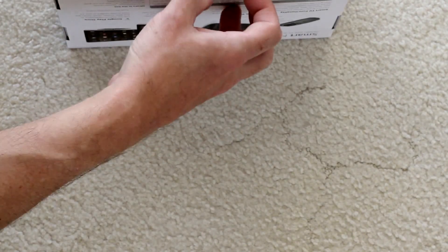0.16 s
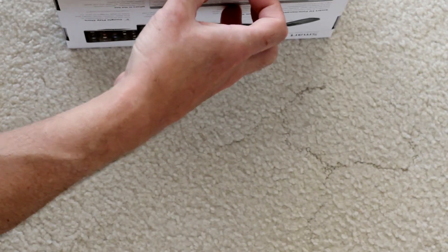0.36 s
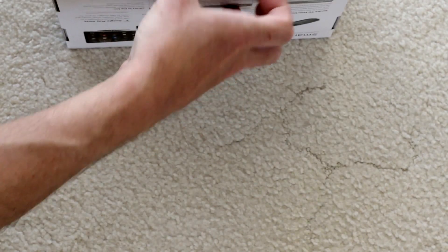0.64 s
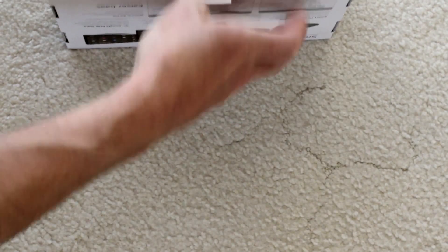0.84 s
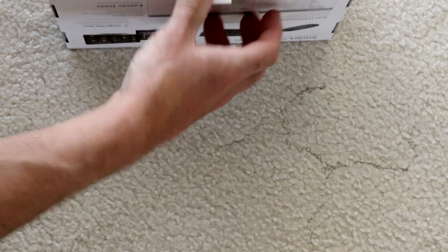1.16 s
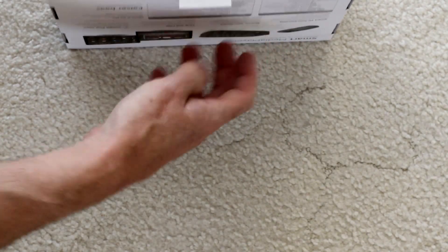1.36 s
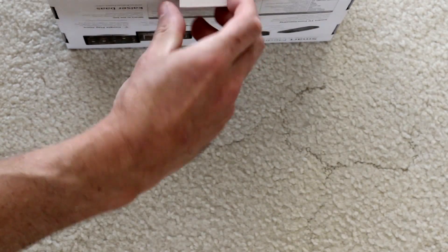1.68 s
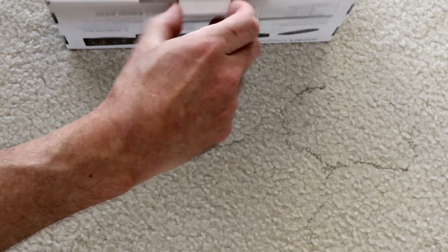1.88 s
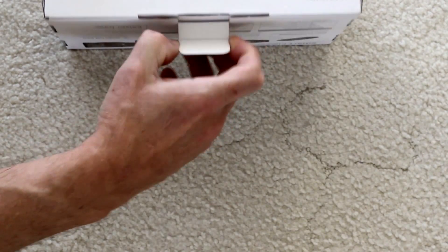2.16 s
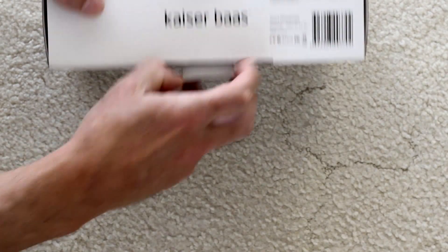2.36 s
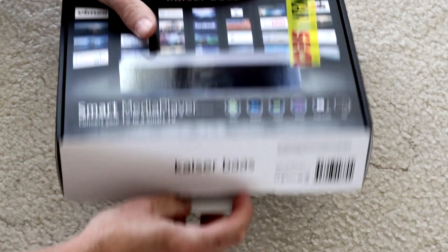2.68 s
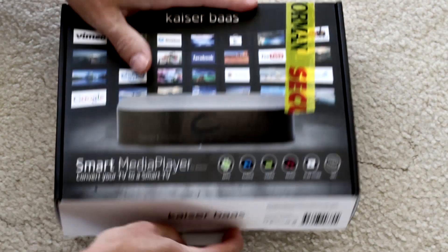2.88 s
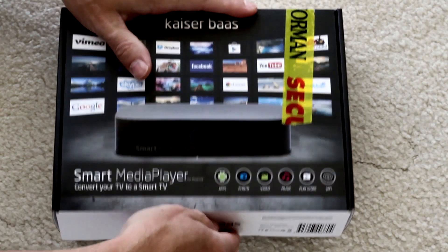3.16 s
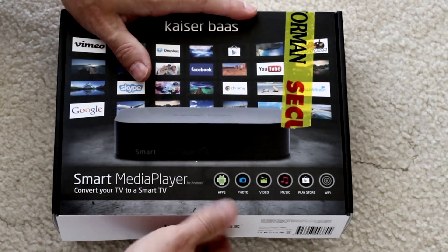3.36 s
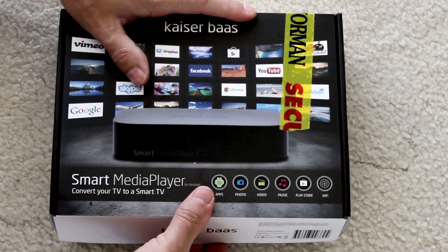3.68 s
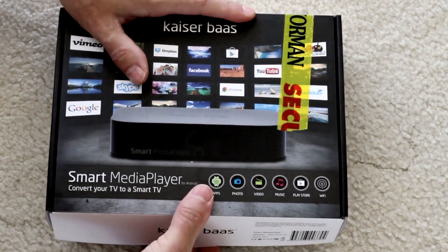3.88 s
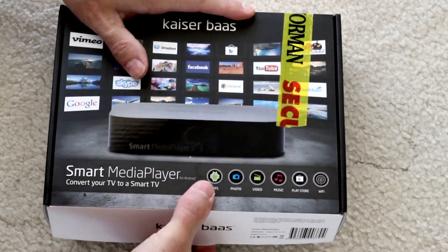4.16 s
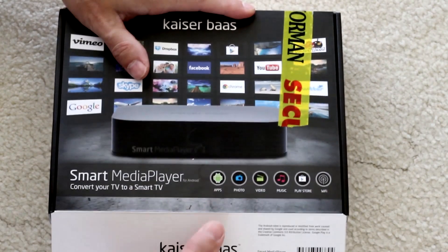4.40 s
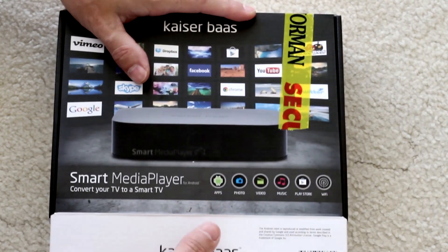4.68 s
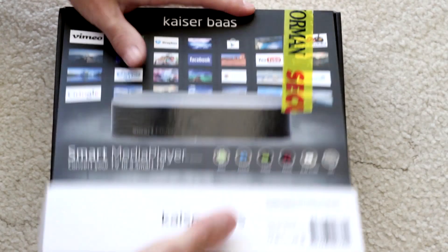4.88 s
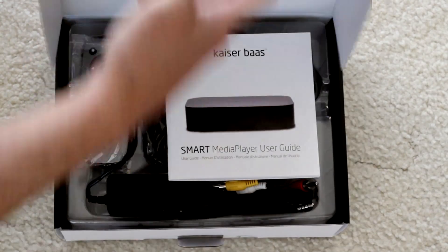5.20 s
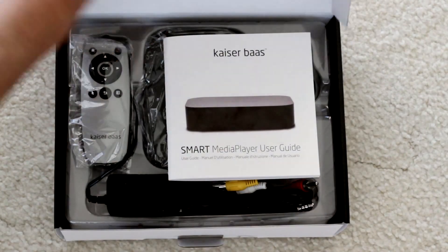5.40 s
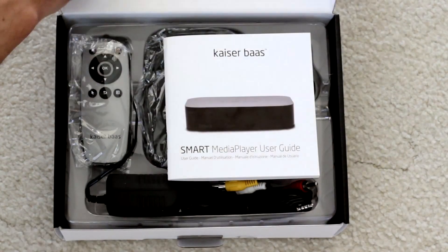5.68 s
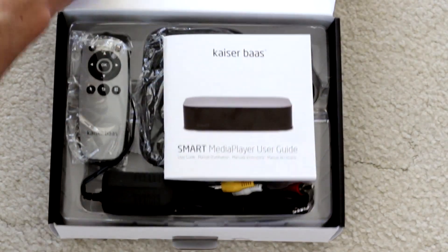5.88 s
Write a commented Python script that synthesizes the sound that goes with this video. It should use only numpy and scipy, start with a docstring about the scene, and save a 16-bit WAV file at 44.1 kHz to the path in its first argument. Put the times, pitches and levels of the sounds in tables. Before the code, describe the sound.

A cardboard box is opened by hand, close to a camera microphone in a small furnished room with a short, soft echo. Steady low hiss runs throughout. From 0 to 0.8 s fingers pick at the tab with faint ticks and light taps, a thin hoarse whistle far off at 0.3. At 0.9 a loud double snap with a gritty scrape frees the tab, which shivers briefly; a clear knock follows at 1.35. From 1.6 to 2.6 come uneven papery scrapes and hollow taps. Around 2.9 to 3.3 the box brushes across carpet with small bumps. Quiet fumbling and rubbing lead to a very sharp, dry double snap at 4.4. Softer rubs and taps follow, then a swish of card at 5.0 to 5.1 as the lid lifts. Sparse taps, the faint whistle again at 5.4, and a small stuttering fold creak at 5.7 to 5.9 end it, with low air puffs.

```python
"""A cardboard box: a hand works its tab loose, drags it over a carpet, pulls the flap out and lifts the lid.
Knocks, snaps and scrapes are noise bursts ringing the hollow, panels, edges and paper fibres; rubbing is grainy
noise in the same resonances. The freed tab, the carpet and the creaking fold are noise with their own colours.
A thin, jittery tone whistles far off and low noise puffs. A small furnished room answers the contacts, over
the steady hiss of a camera microphone."""
import sys
import numpy as np
from scipy import signal
from scipy.fft import rfft, irfft, next_fast_len
from scipy.io import wavfile
from scipy.ndimage import map_coordinates

SR = 44100
rng = np.random.default_rng(int(sys.argv[2]) if len(sys.argv) > 2 else 0)


def wrap_up_sound(samples):
    """Save the sound to the file named by the first command line argument, as 16-bit audio."""
    columns = np.atleast_2d(samples).T
    # keep every value between -1 and 1, then stretch to whole-number steps
    tamed = np.clip(columns, -1, 1)
    steps = np.round(tamed * 32767).astype(np.int16)
    wavfile.write(sys.argv[1], SR, steps)


N = 266452

# Knocks and snaps. Each row: start in seconds, panel level in dB, hollow, edges and fibres in dB over it,
# panel note in Hz, decay time (t60) in seconds before each part takes its share.
KNOCKS = [(.028, -39, -5, 0, -5.5, 940, 0.048), (.194, -52, -15, -3, -6, 1310, 0.049),
          (.302, -25, -4.5, -25, -29, 900, .062), (.471, -46, -15, -2, -18, 880, 0.053),
          (0.4973, -26, -3.5, 1.5, -4, 955, .04), (.573, -42.5, -4, 0, -20, 1350, 0.039),
          (.602, -45.5, -6, 1, -18, 1420, 0.03), (.693, -51, -3, 12, -22, 1280, 0.02),
          (0.757, -35, -3, -7, -18, 1670, .036), (.785, -36, -17, -5, -7, 1040, .03),
          (.877, -10.5, -16.5, -13, -18, 1200, 0.057), (.895, -4.5, -22, -13, -23, 1290, 0.066),
          (.951, -30.5, 10, -20, -20, 1220, .05), (1.256, -39.5, -13, -1.5, -22, 1990, .043),
          (1.31, -30, -19, -4, -9, 1680, .07), (1.352, -15, 0.5, -5.5, -30, 1280, 0.046),
          (1.58, -27.5, -8.5, -9, -26, 940, 0.044), (1.591, -26, -11, -9, -20, 1410, 0.039),
          (1.9, -28, -10.5, -23, -20, 1820, .051), (2.031, -39.5, -5, 1, -2, 960, 0.067),
          (2.121, -18, -8.5, -9, -8.5, 1010, 0.04), (2.196, -31.5, -8, -11, -31, 1340, 0.047),
          (2.442, -29.5, -12, -15, -31, 1310, .055), (2.559, -29, -15, -19, -30, 1430, 0.038),
          (2.745, -42.5, -7, -1, -13, 894, 0.037), (2.891, -31.5, -11.5, -17, -28, 1980, 0.022),
          (2.913, -38, -1, -7, -20, 740, 0.042), (2.962, -22.5, -11, -7, -14, 740, 0.019),
          (3.204, -26.5, 3, -9, -23, 700, 0.016), (3.239, -24, -13, -11, -14, 770, .035),
          (3.249, -22.5, -22, -15, -31, 700, 0.04), (3.548, -43.5, 1.5, -3, -3.5, 891, .035),
          (3.571, -40.5, -2, -5, -12, 730, .025), (3.597, -32, -8, -19, -24, 750, 0.024),
          (3.621, -30, -14, 1.5, 4, 736, .02), (4.093, -32.5, -14, -11, -21, 703, 0.04),
          (4.104, -22, -21, -15.5, -32, 1750, 0.051), (4.151, -24.5, -6, -18, -23, 1500, .035),
          (4.193, -32.5, -7, -18, -26, 1540, .032), (4.211, -28, -14, -9, -33, 960, .025),
          (4.388, -5.5, -11.5, -14, -25, 1520, .02), (4.397, -3.5, -15.5, -9.5, -18, 1630, 0.024),
          (4.402, -25.5, -5, -1, -16, 1570, 0.019), (4.747, -31, -8, -10, -28, 710, .03),
          (4.792, -24, -20, -11.5, -23, 820, .042), (4.876, -24.5, -18, -17.5, -38, 730, 0.057),
          (4.972, -30, -3.5, 5, 0, 2140, 0.029), (4.983, -28, -7, -2.5, -1, 740, 0.096),
          (5.124, -36.5, -16, 7, -10, 1420, .045), (5.148, -33, -14, -5, -4, 760, 0.037),
          (5.195, -37.5, -14, -3, -8, 880, .036), (5.299, -52.5, -4, 7, 14, 1490, 0.019),
          (5.323, -40, -23.5, -11, -0.5, 1170, 0.026), (5.423, -31, -6, -12, -35, 1410, 0.033),
          (5.473, -38, -8, -10, -24, 2140, .045), (5.698, -23, -22, -16.5, -38, 880, 0.044),
          (5.974, -29, -10.5, -28, -33, 738, 0.041)]
# Short scrapes of finger and flap. Each row: as for the knocks, but timed at the loudest moment.
SCRAPES = [(.168, -38.5, 0.5, -1, -11.5, 1370, .03), (0.208, -47.5, -15, 4, -14, 1390, 0.06),
           (0.295, -51, 1, 4, -2, 1420, .07), (.902, -9, -16, -5, -6.5, 1190, 0.051),
           (1.14, -48, -19, -17, -8, 1340, .07), (1.3, -35.5, -9, -7, -14, 1220, 0.18),
           (1.618, -27.5, -18, -22, -33, 680, .09), (1.717, -27, -18, -11, -21, 1940, .14),
           (1.973, -41, -23, -5.5, -20, 1310, .11), (2.063, -24, -9.5, -2, -12.5, 1410, .1),
           (2.088, -33, -14, 0, -9, 2050, 0.11), (2.224, -39, -6, -9, -31, 1380, .14),
           (2.361, -33, -10, -10, -19, 1290, .05), (2.464, -39.5, -13, -8, -30, 1450, 0.074),
           (2.538, -32, -15, -7, -38, 1420, 0.15), (2.936, -35.5, -2.5, -10, -26, 1160, 0.099),
           (3.262, -33, -9.5, -11, -23, 730, .09), (3.446, -42, -2.5, -19, -25, 820, 0.051),
           (3.664, -28, -6, -7.5, -17, 1610, 0.087), (4.006, -33.5, -10.5, -19, -30, 895, 0.054),
           (4.082, -35, -9.5, -21, -30, 1530, .05), (4.119, -29, -10, -18, -30, 780, 0.21),
           (4.31, -41.5, 2.5, -14, -27, 800, .09), (4.341, -27, -5.5, -14.5, -28, 1700, 0.13),
           (4.385, -13.5, -9, -13.5, -16, 1520, 0.067), (4.45, -40, -5, 2.5, -12, 1430, 0.067),
           (4.614, -38.5, -5, -5, -17, 1510, .11), (4.656, -42, 2.5, -21, -30, 760, .16),
           (4.714, -31.5, -6.5, -18, -30, 710, .1), (4.824, -44, -2, -5, -12, 760, 0.066),
           (5.014, -27.5, -10.5, -21, -15, 940, 0.099), (5.072, -32, -2, -15, -22, 905, .12),
           (5.094, -33.5, -4, -7, -22, 760, 0.11), (5.893, -30.5, -14, -11, -23.5, 920, 0.069)]
# Resonances of the air and big walls, of the flaps, and of the stiff tab and edges.
# Each row: frequency in Hz, width in Hz, relative level in dB.
HOLLOW = [(140, 35, -15), (211.7, 31, -0.5), (299.3, 33.3, 0.5), (362.4, 38, 1), (513, 30, 0),
          (656.5, 41, 1)]
PANELS = [(856, 108, -8), (1112, 128, -7.5), (1137, 59, -4.5), (1406, 62, -15.5), (1596, 116, -8),
          (1667, 455, -11), (2104, 700, -17.5)]
EDGES = [(2715, 1380, 6), (2487, 2340, -4), (3876, 82, 5), (3815, 1530, -2), (5350, 570, 2.5),
         (5400, 224, 2), (6110, 1050, -10)]


def amp(db):
    """Gain of a level in dB."""
    return 10 ** (np.asarray(db) / 20)


def unit(x):
    """x at rms 1."""
    return x / np.sqrt(np.mean(x ** 2) + 1e-20)


def along(points, hz):
    """Values at hz, read from (Hz, value) points on a log frequency axis."""
    point_hz, values = np.transpose(points)
    return np.interp(np.log(hz + 1), np.log(point_hz + 1), values)


def curves(rows):
    """One value per sample for each column after the time."""
    seconds, *columns = np.transpose(rows)
    t = np.arange(N) / SR
    return [np.interp(t, seconds, column) for column in columns]


def wobble(rate):
    """A smooth random curve, rate knots a second."""
    knots = rng.standard_normal(int(N * rate / SR) + 4)
    return map_coordinates(knots, [np.arange(N) * rate / SR])


def swell(start, end, rise_db, fall_db):
    """Gain 1 from start to end, rising before and falling after by so many dB a second."""
    t = np.arange(N) / SR
    return amp(-rise_db * np.maximum(start - t, 0) - fall_db * np.maximum(t - end, 0))


def filtered(x, response):
    """x shaped by a complex response of frequency."""
    size = next_fast_len(x.shape[-1] + 8192)  # spare room for ringing
    spectrum = rfft(x, size) * response(np.fft.rfftfreq(size, 1 / SR))
    return irfft(spectrum, size)[..., :x.shape[-1]]


def modes(table):
    """The causal response of a set of resonances, falling steeply outside their range."""
    lo_hz, hi_hz = .75 * min(table)[0], 1.4 * max(table)[0]

    def response(f):
        skirts = (1j * f / (lo_hz + 1j * f)) ** 2 * (hi_hz / (hi_hz + 1j * f)) ** 2
        total = 0
        for k, (hz, width, db) in enumerate(table):
            resonance = 1j * f * width / (hz * hz - f * f + 1j * f * width)
            total = total + (-1) ** k * amp(db) * resonance  # rows alternate in polarity
        return skirts * total

    return response


def fibres(f):
    """The top end of any contact of paper on paper."""
    # Colour of paper fibres. Each row: frequency in Hz, relative level in dB per Hz.
    fizz = [(5000, -9), (7000, 3), (8000, 1), (10000, -6), (13000, -7.5), (17000, -18)]
    return amp(along(fizz, f))


def settling():
    """After every contact the hollow, panels, edges and fibres rustle on, each dying at its own speed."""
    under_db, t60_s = (-18, -28.5, -30.5, -26), (0.26, 0.29, 0.39, 0.24)  # in that order, dB against its level
    s, db, hollow_db, edge_db, fibre_db = np.transpose(KNOCKS + SCRAPES)[:5]
    kicks = np.zeros((4, N))
    kicks[:, np.round(s * SR).astype(int)] = amp(db + [hollow_db, 0 * db, edge_db, fibre_db])
    gains = []
    for kick, part_db, t60 in zip(kicks, under_db, t60_s):
        decay = amp(-60 / (t60 * SR))  # per sample
        gains.append(amp(part_db) * signal.lfilter([1], [1, -decay], kick))
    return gains


def rubbing():
    """Fibres catch and let go: noise with small grains of uneven size, in the same resonances as the knocks."""
    # Card on card and carpet, before settling adds to it.
    # Each row: time in seconds, level in the hollow in dB, in the panels in dB, of the scratch in dB.
    rub_levels = [(0.0, -52.5, -54.5, -57.5), (0.79, -61, -62, -60.5), (0.94, -51, -43, -45),
                  (1.18, -53.5, -58.5, -60.5), (1.43, -47.5, -66, -60.5), (1.63, -55, -47, -55),
                  (1.85, -50.5, -50.5, -58.5), (2.1, -58, -43, -50), (2.27, -52.5, -54.5, -59.5),
                  (2.78, -55, -58.5, -61), (2.94, -51, -53, -59), (3.11, -53.5, -56, -53),
                  (3.3, -54.5, -52.5, -58), (3.68, -46.5, -52.5, -60.5), (3.87, -48, -57, -61),
                  (4.14, -57, -58, -61.5), (4.29, -53, -58, -61), (4.47, -50.5, -45.5, -54.5),
                  (4.91, -47.5, -52, -51), (5.05, -43, -41.5, -40.5), (5.21, -57, -57, -57),
                  (5.43, -59, -60, -60), (5.85, -58.5, -54, -50), (6.04, -56, -54, -53)]
    fibre_db = -10.5  # over the scratch
    clumps = wobble(45)  # shared by all four parts
    hollow_db, panel_db, scratch_db = curves(rub_levels)
    rub_gains = amp([hollow_db, panel_db, scratch_db, scratch_db + fibre_db])
    gains = np.hypot(rub_gains, settling())
    out = np.zeros(N)
    for gain, response in zip(gains, [modes(HOLLOW), modes(PANELS), modes(EDGES), fibres]):
        sizes = amp(2 * rng.exponential(size=N)) * rng.standard_normal(N)
        catches = (rng.random(N) < .03) * sizes
        grain = rng.standard_normal(N) + unit(catches)
        drive = amp(2 * clumps + wobble(25)) * grain
        out += gain * unit(filtered(drive, response))
    return out


def puffs():
    """Air near the microphone: low resonant noise stirs faintly and swells with each push."""
    # Air pushed by lid and hand, and floor thumps. Each row: start in seconds, length in seconds, level in dB.
    pushes_of_air = [(0.87, 0.13, -51), (1.342, 0.081, -55), (1.565, 0.064, -49), (2.744, 0.04, -52),
                     (4.371, 0.11, -72), (4.715, 0.058, -55), (4.812, 0.052, -52), (4.946, 0.3, -55),
                     (5.421, 0.064, -45.5), (5.865, 0.094, -52)]
    stir_db, rise_share = -69.5, 0.34  # level between puffs; share of the length spent rising
    low = filtered(rng.standard_normal(N), modes([(72.4, 100, 8), (138, 95, -12.5)]))
    t = np.arange(N) / SR
    gain = amp(stir_db)
    for s, length, db in pushes_of_air:
        gain = gain + amp(db) * np.interp(t, [s, s + rise_share * length, s + length], [0, 1, 0])
    return gain * amp(0.61 * wobble(24)) * unit(low)


def hiss():
    """Steady room tone and microphone noise."""
    # Each row: frequency in Hz, relative level in dB per Hz.
    hiss_colour = [(15, -14), (25, -11), (49, -6), (133, -2), (275, -0.5), (413, -15.5), (498, -14),
                   (707, -1.5), (1430, -5), (1920, -11), (3660, -18.5), (14500, -19), (15700, -15)]
    noise = filtered(rng.standard_normal(N), lambda f: amp(along(hiss_colour, f)))
    return amp(-54) * unit(noise)


def contacts(table, rise_share, slap, lead, dense):
    """A contact drives hollow, touched panel, edges and fibres with a ragged burst and, for knocks, one slap."""
    # Peak in dB over the level, for hollow, panel, edges and fibres.
    crest_db = (4, -1, 6.5, 12.5)
    # Notes a contact favours, and their spread as a share.
    favoured_hollow_hz, favoured_edge_hz, note_scatter = 540, 3820, 0.13
    t60_shares = np.array([[1.1], [.8], [.7], [.6]])  # hollow to fibres
    rise_powers = [[1.2], [1.5], [2.2], [2.5]]
    out, t = np.zeros(N + SR), np.arange(8192) / SR
    f = np.fft.rfftfreq(len(t), 1 / SR)
    for s, db, hollow_db, edge_db, fibre_db, panel_hz, t60 in table:
        rise = np.clip(rise_share * t60, .0004, .04)  # seconds
        decay = amp(-60 * np.maximum(t - rise, 0) / (t60_shares * np.clip(t60, .003, .2)))
        shape = np.minimum(t / rise, 1) ** rise_powers * decay
        force = shape * rng.standard_normal(len(t)) * (rng.random(len(t)) < dense)  # only some fibres catch
        force[:, round(rise * SR)] += slap
        scatter = np.exp(note_scatter * rng.standard_normal(2))
        hollow_hz, edge_hz = [favoured_hollow_hz, favoured_edge_hz] * scatter
        bodies = [modes(HOLLOW + [(hollow_hz, 110, 6)]),
                  modes(PANELS + [(panel_hz, 220, 7)]),
                  modes(EDGES + [(edge_hz, 900, 3)]),
                  fibres]
        rings = irfft(rfft(force) * [body(f) for body in bodies], len(t))
        peaks = amp(db + np.add([hollow_db, 0, edge_db, fibre_db], crest_db))
        gains = peaks / np.max(np.abs(rings), axis=1)
        begin = round((s - lead * rise) * SR)
        out[begin:][:len(t)] += gains @ rings
    return out[:N]


def room(x):
    """Each frequency of the room's answer dies at its own speed; every stretch of .3 s gets its own tail."""
    # Decay of the furnished room. Each row: frequency in Hz, decay time (t60) in seconds.
    room_decay = [(150, 0.3), (1000, 0.3), (3000, 0.21), (9000, 0.11)]
    out, step = np.zeros(N + 2 * SR), round(.3 * SR)
    for i in range(0, N, step):
        hz, t, z = signal.stft(rng.standard_normal(SR // 2), SR, nperseg=256)
        dying = z * amp(-60 * t / along(room_decay, hz)[:, None])
        tail = signal.istft(dying, SR, nperseg=256)[1]
        wet = signal.fftconvolve(x[i:i + step], tail / np.linalg.norm(tail))
        out[i + 350:][:len(wet)] += wet  # the answer comes 350 samples late
    return out[:N]


def whistle():
    """A thin, hoarse tone: it slides up to its note, its pitch jitters fast and its level flutters."""
    # Far whistle. Each row: start in seconds, length in seconds, note in Hz, peak level in dB before flutter.
    whistle_notes = [(.33, 0.17, 2270, -57.5), (1.55, 0.042, 2250, -59), (5.40, 0.25, 2270, -54)]
    swoop_hz, swoop_s = 150, 0.029  # starts this far below; the gap shrinks by 9 dB in this time
    out = np.zeros(N)
    for s, length, note_hz, db in whistle_notes:
        hz = note_hz - swoop_hz * swell(0, s, 0, 9 / swoop_s)
        jittery_hz = hz + 90 * wobble(400)
        tone = np.sin(2 * np.pi * np.cumsum(jittery_hz) / SR)
        rough = amp(3 * wobble(90)) * tone
        out += swell(s, s + length, 600, 600) * amp(db) * rough
    return out


def tab():
    """The freed tab shivers on after its snap: noise in its resonances, dying away."""
    # Box and tab once the tab is free. Each row: frequency in Hz, width in Hz, relative level in dB.
    tab_modes = [(470, 19, 4), (1400, 98, -4.5), (3600, 90, -21), (4140, 90, -15.5), (5700, 79, -17),
                 (7470, 120, -21)]
    # The moment the tab is free: start in seconds, level in dB, decay time (t60) in seconds.
    s, db, t60 = (.905, -28.5, 0.7)
    t = np.arange(N) / SR - s
    shiver = unit(filtered(rng.standard_normal(N), modes(tab_modes)))
    return (t > 0) * amp(db - 60 * np.abs(t) / t60) * shiver


def drag():
    """Carpet fibres brush the bottom of the sliding box: a dense, even hiss in the colour of the pile."""
    # Carpet pile under card. Each row: frequency in Hz, relative level in dB per Hz.
    pile_colour = [(530, -44), (900, -23), (1040, 0), (1250, -27), (1500, -5.5), (1800, 5.5), (4190, -3.5),
                   (5620, 0.5), (6400, -11), (12000, -22), (15600, -54), (22000, -120)]
    # The slide over the carpet: start in seconds, end in seconds, level in dB.
    start, end, db = (2.864, 3.26, -48.5)
    slide = swell(start, end, rise_db=70, fall_db=82) * amp(1.2 * wobble(43))
    brush = filtered(rng.standard_normal(N), lambda f: amp(along(pile_colour, f)))
    return slide * amp(db) * unit(brush)


def creak():
    """The fold of the lid slips: quick, uneven swells of noise heard through its resonances."""
    # Each row: loudest moment in seconds, level in dB.
    creak_slips = [(5.704, -37.5), (5.811, -38.5), (5.902, -37.5)]
    # Resonances of the fold. Each row: frequency in Hz, width in Hz, relative level in dB.
    fold_modes = [(873, 68, 3.5), (2320, 47, -14), (2830, 170, -11)]
    slips = sum(amp(db) * swell(s, s, rise_db=452, fall_db=400) for s, db in creak_slips)
    return slips * amp(wobble(65)) * unit(filtered(rng.standard_normal(N), modes(fold_modes)))


def scene():
    """The box close by, its echo in the room, the background."""
    blows = contacts(KNOCKS, rise_share=.03, slap=7.26, lead=0, dense=.9)
    scrapes = contacts(SCRAPES, rise_share=.24, slap=0, lead=1, dense=0.2)
    box = scrapes + tab() + creak() + drag() + rubbing()
    echo = amp(-10.5) * room(blows + scrapes)
    softer = box + whistle() + puffs() + hiss() + echo
    top_hz = 15750  # everything but the direct knocks ends here
    return (blows + filtered(softer, lambda f: f < top_hz))[None]


def record(dry):
    """The camera adds a small offset, clips near full scale and keeps nothing above its band limit."""
    top_hz = 16800
    return filtered(np.clip(dry + .001, -.97, .97), lambda hz: hz < top_hz)


dry = scene()
out = record(dry)
wrap_up_sound(out)
```